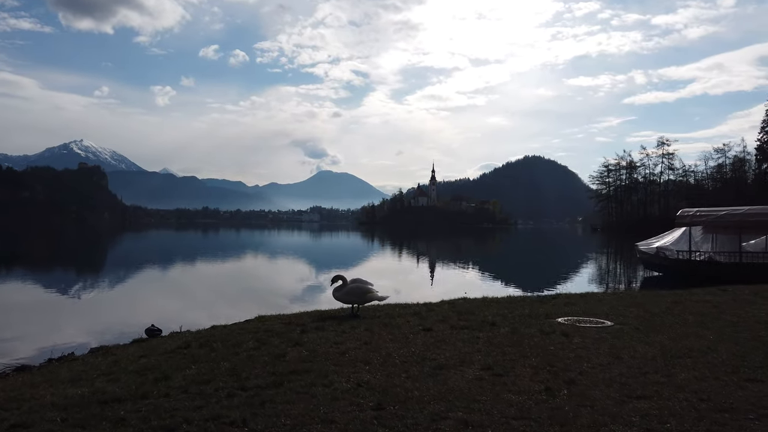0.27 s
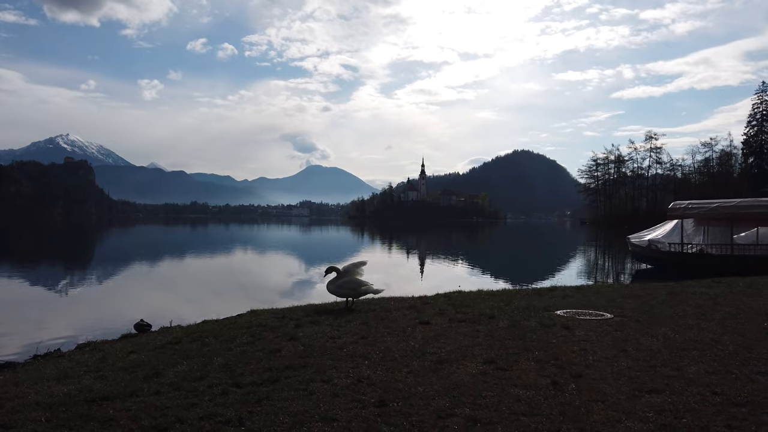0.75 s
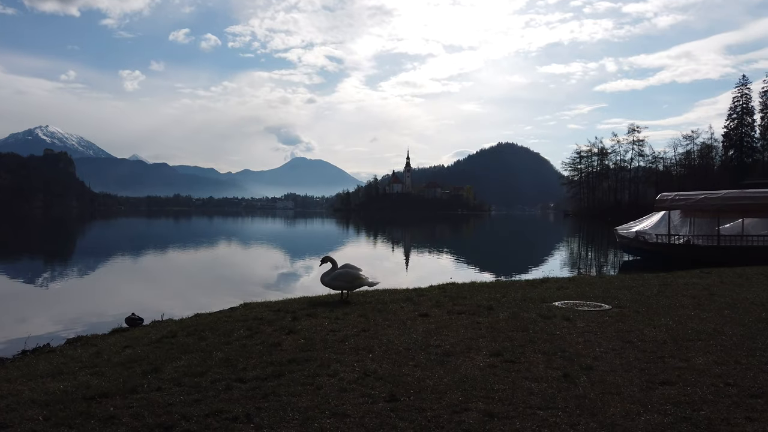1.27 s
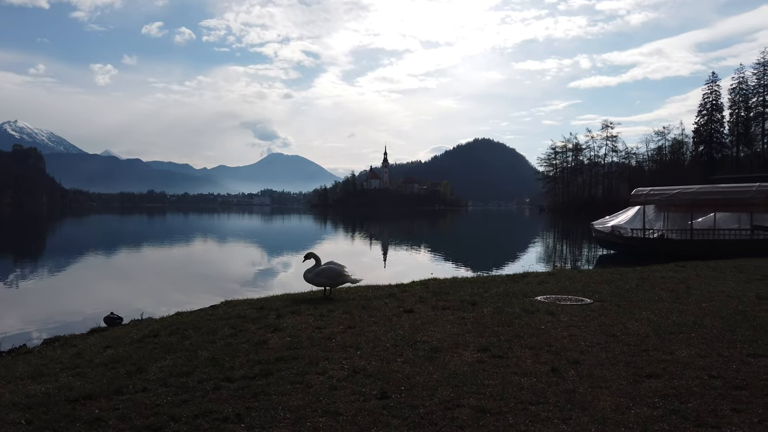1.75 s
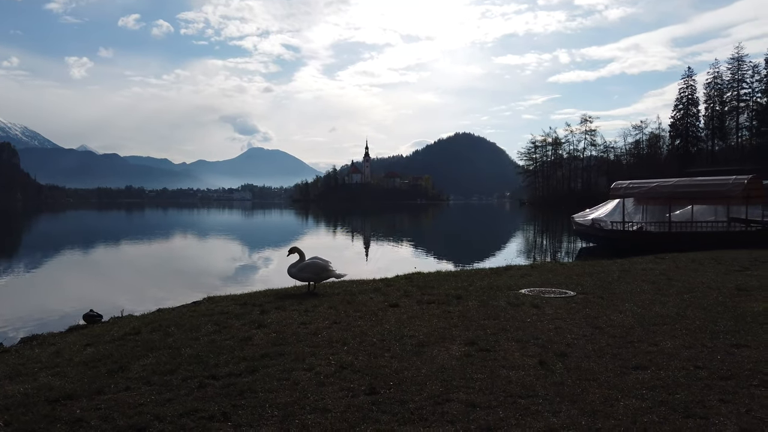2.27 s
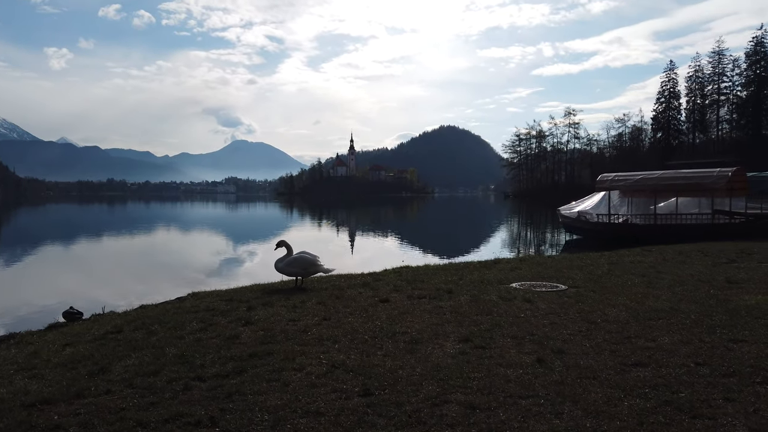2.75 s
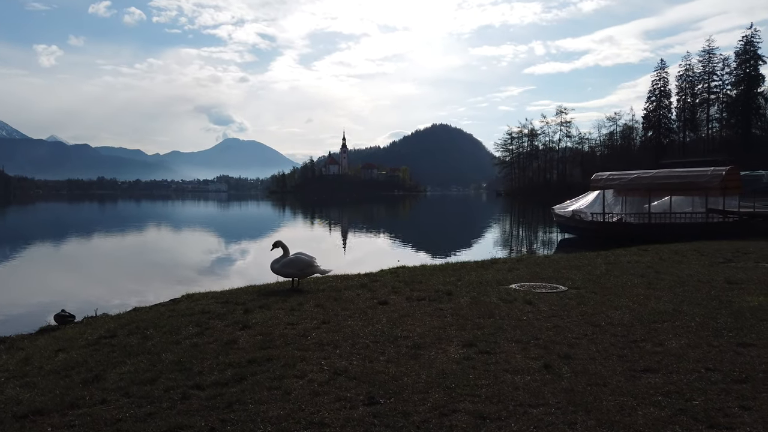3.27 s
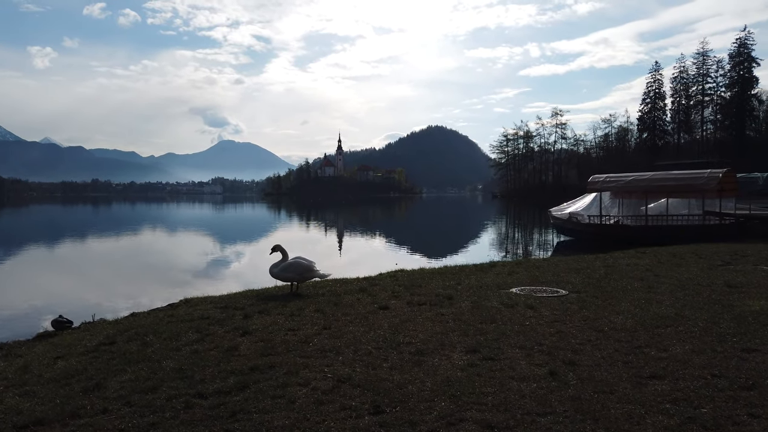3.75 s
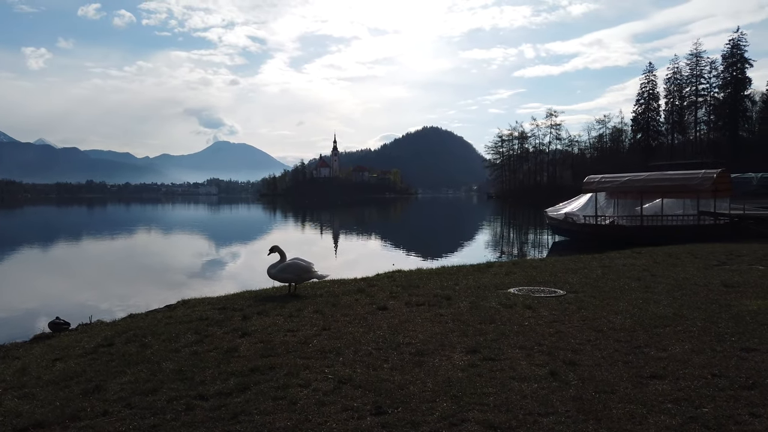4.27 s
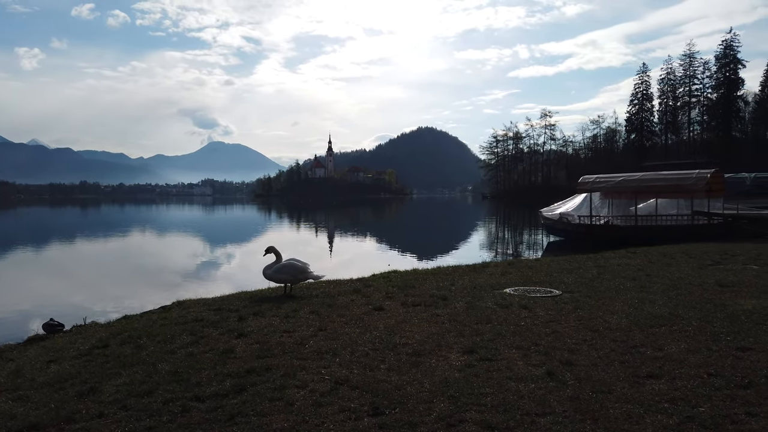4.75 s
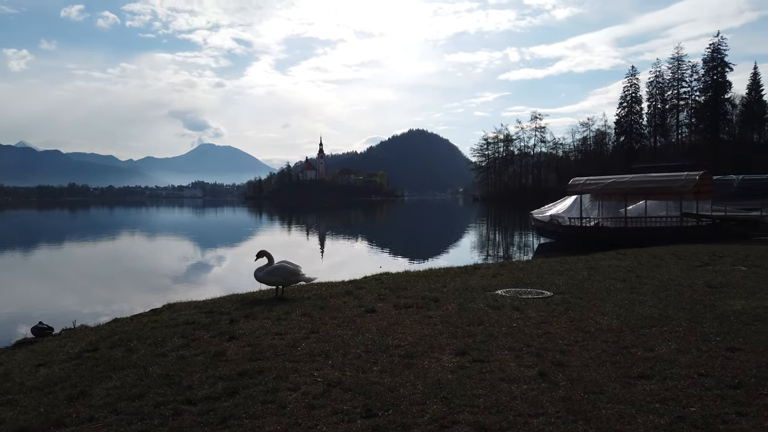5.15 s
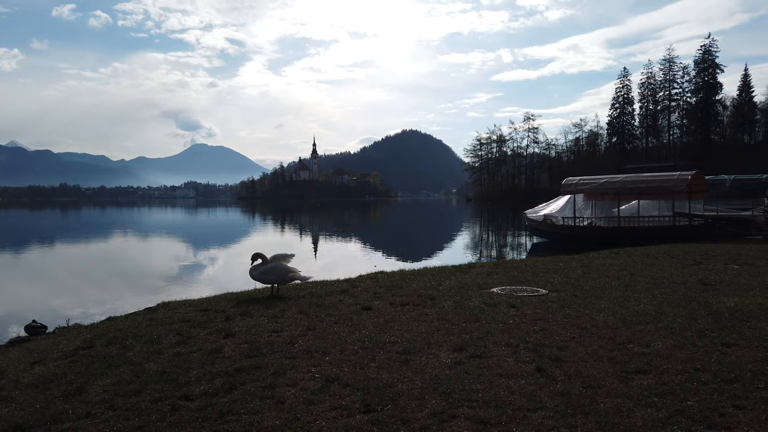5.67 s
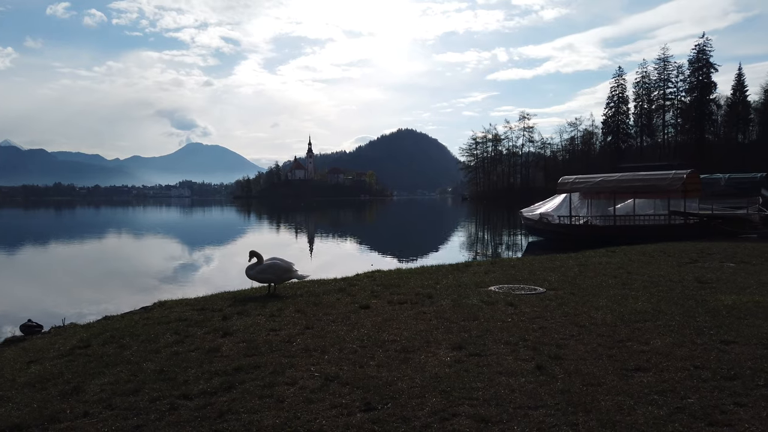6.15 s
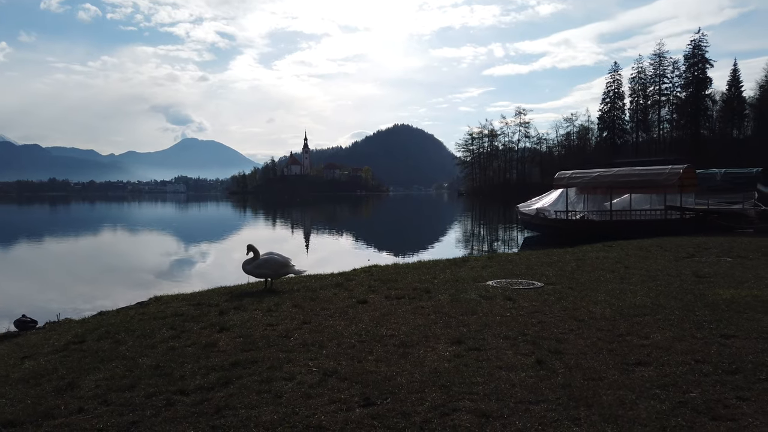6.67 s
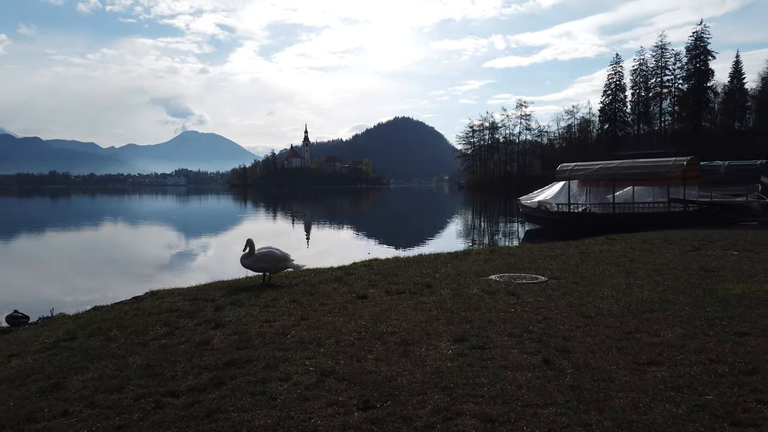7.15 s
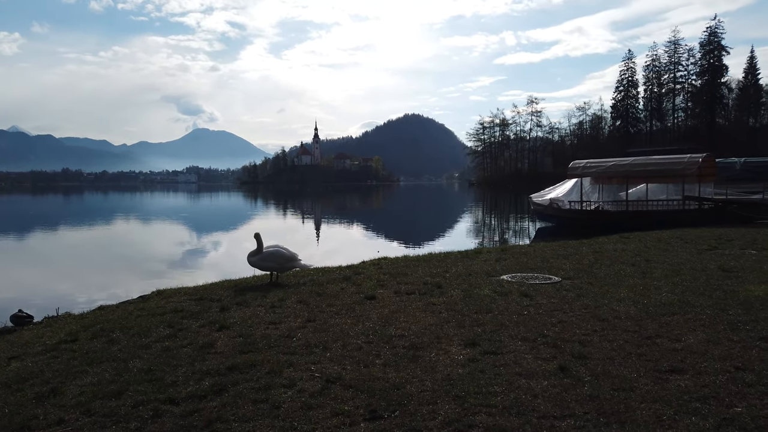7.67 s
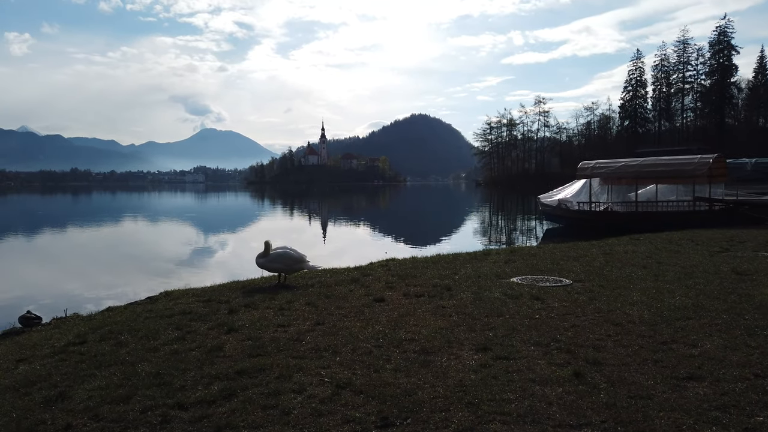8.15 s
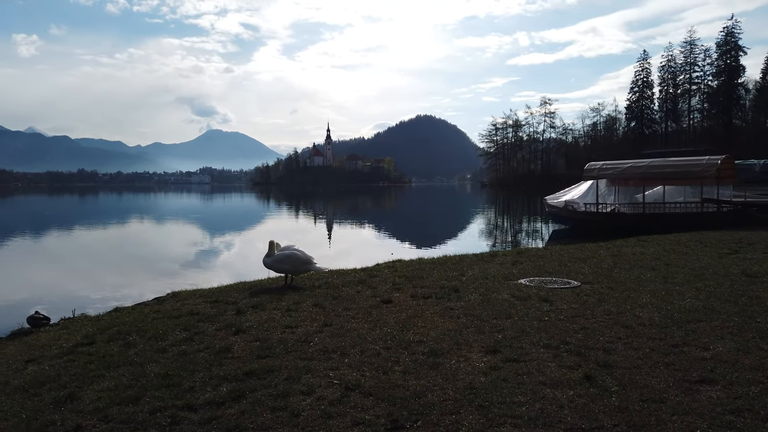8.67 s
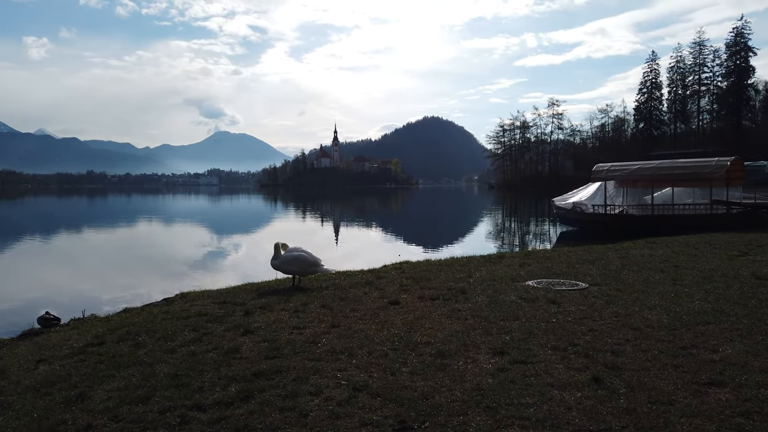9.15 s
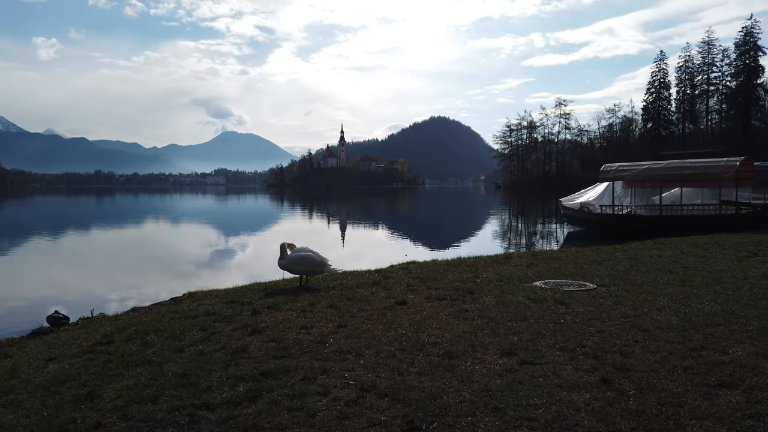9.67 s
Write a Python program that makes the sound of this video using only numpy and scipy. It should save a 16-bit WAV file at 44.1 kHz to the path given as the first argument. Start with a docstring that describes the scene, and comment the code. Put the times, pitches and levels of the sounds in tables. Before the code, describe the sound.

Open lakeside heard through a hand-held stereo camera: low wind rumble and ticks open the scene, then a firm knock at 1.7 seconds. Hoarse little quacks from the middle distance thicken and grow louder, with faint shore echo. Thin, piercing songbird notes come and go, faint pips and whistles sit farther off, and water laps softly at the bank over a distant hush.

```python
"""Ducks and songbirds on a calm lake

Ducks quack in quick runs: each quack is a short train of rough pulses ringing the throat, with a faint shore echo.
A small songbird repeats high arched and slurred notes, and far birds whistle, chirp and pip: gliding tones.
Light wind, as shaped noise, buffets the microphone of a hand-held camera; thumps ring the camera body.
Filtered noise makes the ticks, a scuff, the rustle of a sleeve, laps at the bank and the valley's soft wash."""
import sys
import numpy as np
from scipy import signal
from scipy.fft import rfft, irfft, next_fast_len
from scipy.io import wavfile
from scipy.ndimage import uniform_filter1d, map_coordinates

SR = 44100
rng = np.random.default_rng(int(sys.argv[2]) if len(sys.argv) > 2 else 0)


def master(y):
    """Save y as 16-bit WAV."""
    cut = np.clip(np.atleast_2d(y).T, -1, 1)
    pcm = np.round(cut * 32767)  # scale
    wavfile.write(sys.argv[1], SR, pcm.astype(np.int16))


N = 437031
TIME = np.arange(N) / SR


def undb(db):
    """Decibels to gain."""
    return 10 ** (np.asarray(db) / 20)


def unit(x):
    """Scale to rms 1."""
    return x / np.sqrt(np.mean(x ** 2) + 1e-30)


def decay(t, t60):
    """Exponential decay that falls 60 dB in t60 seconds."""
    return np.exp(-np.log(1000) * t / t60)


def curve(rows):
    """Join (t/s, value) rows by straight lines."""
    return np.interp(TIME, *np.transpose(rows))


def add(track, s, x):
    """Mix a short sound into a track at time s."""
    i = int(np.clip(s * SR, 0, N))
    track[i:i + len(x)] += x[:N - i]


def colour(x, gain):
    """Filter by a gain that is a function of frequency."""
    size = x.shape[-1]
    n = next_fast_len(size + 2048)
    hz = np.arange(n // 2 + 1) * SR / n + 1e-3
    return irfft(rfft(x, n) * gain(hz), n)[..., :size]


def resonance(f, hz, width):
    """Gain of one broad resonance."""
    return 1 / (1 + 2 * ((f - hz) / width) ** 2)


def walk(rate, size=N):
    """Smooth random wandering with a spread near 1."""
    k = max(int(SR / rate), 1)
    steps = np.repeat(rng.standard_normal(size // k + 1), k)
    return uniform_filter1d(steps, k)[:size]


def noise(points, side, apart_hz=4000):
    """Stereo noise with an (f/Hz, level/dB) spectrum; side sets how far the ears differ below apart_hz.

    Well above apart_hz the two ears are unrelated."""
    hz, db = np.transpose(points)
    white = rng.standard_normal((2, N))
    mid, wide = colour(white, lambda f: undb(np.interp(np.log(f), np.log(hz), db)))
    share = lambda f: side + (1 - side) / (1 + (apart_hz / f) ** 6)
    mid = colour(mid, lambda f: 1 / np.hypot(1, share(f)))
    wide = colour(wide, lambda f: share(f) / np.hypot(1, share(f)))
    return unit(np.array([mid + wide, mid - wide]))


def patchy(x, spread_db, rate, width_hz, above_hz):
    """Let each stretch of the spectrum flicker in level on its own, the bass half as much as the treble."""
    f, t, z = signal.stft(x, SR, nperseg=512)
    where = np.meshgrid(f / width_hz, t * rate, indexing="ij")
    chance = rng.standard_normal((128, 1024))
    flicker = map_coordinates(chance, where, order=1, mode="mirror")
    depth = np.clip(f / above_hz - 1, .5, 1)[:, None]
    return signal.istft(z * undb(spread_db * flicker * depth), SR)[1][:, :N]


def swells(rows, attack_s, release_s):
    """Gain of (t/s, length/s, level/dB) events that rise, hold and die away."""
    total = 0
    for s, length, db in rows:
        rise = np.minimum(TIME - s, 0) / attack_s
        fall = np.maximum(TIME - s - length, 0) / release_s
        total = total + undb(db) * np.exp(rise - fall)
    return total


def burst(gain, attack_s, t60):
    """A short dying burst of noise with the given colour."""
    t = TIME[:SR // 2]
    hiss = unit(colour(rng.standard_normal(len(t)), gain))
    return hiss * np.clip(t / attack_s, 0, 1) * decay(t, t60)


def shore(x, t60, wet_db, gap_s):
    """Diffuse echo from the bank and the trees, fading in over gap_s, different in each ear."""
    t = TIME[:SR]
    tail = rng.standard_normal((2, SR)) * decay(t, t60) * np.clip(t / gap_s, 0, 1)
    tail /= np.sqrt(np.sum(tail ** 2, axis=1, keepdims=True))
    return undb(wet_db) * signal.fftconvolve(x[None], tail, axes=1)[:, :N]


def ears(x, lag_s):
    """A sound from one side reaches the right ear lag_s later (earlier if negative)."""
    return np.array([x, colour(x, lambda f: np.exp(-2j * np.pi * f * lag_s))])


def notes_of(runs, sag_hz):
    """(t/s, f/Hz, level/dB, place in run) of evenly spaced notes, stepping steadily in pitch and level."""
    return [(s + k * spacing, hz - k * sag_hz, db - k * fade, k)
            for s, count, spacing, hz, db, fade in runs for k in range(round(count))]


def note(length, hz, shape, waver, flutter_db, scratch=0):
    """A nearly pure tone that follows a shape in pitch and level; a scratch roughens its start."""
    n = int(length * SR)
    share, ratio, db = np.transpose(shape)
    u = np.linspace(0, 1, n)
    glide = uniform_filter1d(np.interp(u, share, ratio), n // 10, mode="nearest")
    unsteady = waver + scratch * np.exp(-10 * u)
    pitch = hz * glide * (1 + unsteady * walk(900, n))
    level_db = np.interp(u, share, db) + flutter_db * walk(125.7, n)
    swell = undb(level_db) * signal.windows.tukey(n, .1)
    return np.sqrt(2) * swell * np.sin(2 * np.pi * np.cumsum(pitch) / SR)


# spectrum of the valley's wash: f/Hz, relative level/dB
AIR = [(62, -0.5), (90, -12.5), (200, -13.5), (400, -20.5), (800, -24), (2400, -20.5), (3500, -32),
       (5000, -39.5), (8000, -48.5), (12000, -42), (15000, -81)]
# slow ebb of the wash's lower part: t/s, level/dB
EBB = [(1, -57), (4, -62), (9.9, -62.5)]


def air(treble_db=-63, ebb_hz=1700):
    """The soft, far wash of the valley: its lower part ebbs and its treble flickers most."""
    wash = patchy(noise(AIR, side=0.25), spread_db=5, rate=16, width_hz=800, above_hz=2400)
    low = colour(wash, lambda f: 1 / (1 + (f / ebb_hz) ** 4))
    treble = wash - low
    return (low * undb(curve(EBB)) + treble * undb(treble_db)) * undb(walk(2.1))


# spectrum of the wind: f/Hz, relative level/dB
WIND = [(32, 0.5), (52, 2), (75, -7), (120, -18), (180, -30), (300, -39.5), (600, -47.5), (1500, -69),
        (6000, -100)]
# the breeze on the microphone: t/s, level/dB before the wind's gain
BREEZE = [(0, -44), (.45, -40.5), (1.45, -60), (1.8, -49.5), (2.05, -52), (2.35, -66), (2.7, -55.5),
          (2.92, -46), (3.15, -60), (4.4, -69), (5.8, -65), (6.1, -50.5), (6.3, -62), (6.55, -53.5),
          (7, -59.5), (7.85, -41.5), (8.25, -60), (8.9, -76), (9.9, -72)]
# single buffets: t/s, length/s, level/dB before the bass filter and the wind's gain
BUFFETS = [(.12, 0.054, -46), (2.14, 0.058, -46), (2.59, 0.05, -45.5), (7.07, 0.093, -45),
           (7.36, 0.028, -47), (7.55, 0.02, -45), (8.55, 0.031, -40)]


def wind(eddy_s=0.067, gain_db=4, lump_db=2, buffet_hz=80):
    """Eddies buffet the two microphone ports: an uneven breeze, and sudden puffs that are deeper."""
    eddies = noise(WIND, side=.85)
    # even out the level, so that the tables alone set it
    eddies /= np.sqrt(uniform_filter1d(np.mean(eddies ** 2, axis=0), int(eddy_s * SR)))
    breeze = eddies * undb(curve(BREEZE) + lump_db * walk(9))
    deep = colour(eddies, lambda f: 1 / np.hypot(1, f / buffet_hz))
    puffs = deep * swells(BUFFETS, attack_s=0.0038, release_s=0.024)
    return undb(gain_db) * (breeze + puffs)


# spectrum of rubbed cloth: f/Hz, relative level/dB
CLOTH = [(500, 8.5), (1200, 12), (3000, 9), (6600, -9.5), (8300, -0.5), (11000, -2.5), (15500, -11.5)]
# rubs of the sleeve: t/s, length/s, level/dB before the sleeve's gain
RUBS = [(.39, 0.091, -74.5), (1.1, 0.19, -78.5), (1.48, 0.22, -77.5), (1.8, 0.16, -76.5), (2.62, 0.36, -81),
        (3.25, 0.25, -79), (6.65, 0.29, -80), (7.64, 0.37, -86), (8.09, 0.24, -81)]


def sleeve(gain_db=8.5, grain_db=3.5, crackle_db=4):
    """Cloth rubs in fine grains, its colour shifting as the folds move."""
    grains = undb(gain_db + grain_db * walk(40) + crackle_db * walk(1100))
    cloth = patchy(noise(CLOTH, side=1.0), spread_db=7, rate=20, width_hz=650, above_hz=1500)
    return cloth * swells(RUBS, attack_s=0.056, release_s=0.093) * grains


# modes of the camera body: f/Hz before the grip detunes it, relative level/dB, t60/s
BODY = [(156.2, -3, 0.11), (292, 1, 0.016), (470, -2, 0.05), (608, -5.5, 0.02), (846, -7.5, 0.021)]


def thump(bright_hz, t60, drag=0.034):
    """A blow and the dying drag of the skin ring the body; the grip detunes its modes.

    A soft blow has a low bright_hz and reaches only the low modes."""
    t = TIME[:SR // 2]
    push = drag * rng.standard_normal(len(t)) * decay(t, t60)
    push[0] += 1  # the blow itself
    push = signal.sosfilt(signal.butter(2, bright_hz, fs=SR, output="sos"), push)
    grip = 1 + .015 * rng.standard_normal(len(BODY))
    body = np.zeros(len(t))
    for (hz, db, ring_s), detune in zip(BODY, grip):
        body += undb(db) * np.sin(2 * np.pi * hz * detune * t) * decay(t, ring_s)
    sound = signal.fftconvolve(push, body)[:len(t)]
    # the rms of a plain decay, so that long and short thumps start about equally loud
    return unit(sound) * np.sqrt(np.mean(decay(t, t60) ** 2))


# thumps of the hand on the camera, and at 7.779 s a low rumble of the wind played alike: t/s, level/dB,
# brightness f/Hz, t60/s
THUMPS = [(1.663, -34.5, 900, 0.25), (2.005, -46, 198, 0.15), (2.149, -49, 257, 0.67),
          (2.728, -39.5, 220, 0.29), (6.652, -50.5, 705, 0.12), (7.779, -47.5, 110, 0.64)]
# sharp ticks: t/s, level/dB before tick_db, f/Hz, width/Hz before squaring
TICKS = [(0.133, -44, 1690, 600), (0.563, -45.5, 1700, 556), (0.608, -49, 2320, 1700),
         (.652, -44, 1880, 700), (0.677, -48, 1720, 702), (2.504, -42.5, 3660, 1290)]
# a finger's scuff: t/s, length/s, level/dB, f/Hz, width/Hz before squaring
SCUFF = (1.661, .022, -52, 2400, 2900)


def handling(tick_db=3):
    """Thumps on the camera body, a low rumble of the wind, a finger's scuff around the hardest one, and brief
    ticks."""
    out = np.zeros(N)
    for s, db, bright_hz, t60 in THUMPS:
        add(out, s, undb(db) * thump(bright_hz, t60))
    for s, db, hz, width in TICKS:
        tick = burst(lambda f: resonance(f, hz, width) ** 2, attack_s=0.00091, t60=0.018)
        add(out, s, undb(db + tick_db) * tick)
    s, length, db, hz, width = SCUFF
    scuff = unit(colour(rng.standard_normal(N), lambda f: resonance(f, hz, width) ** 2))
    return out + scuff * swells([(s, length, db)], attack_s=.004, release_s=.004)


# laps at the bank, and at 5.318 s a distant call made alike: t/s, level/dB, f/Hz, width/Hz, t60/s
LAPS = [(0.369, -56.5, 714, 348, 0.26), (2.95, -58.5, 930, 686, 0.6), (4.324, -61.5, 620, 120, 0.081),
        (4.535, -56, 554, 120, 0.1), (5.318, -55.5, 1020, 353, 0.43)]


def water():
    """Small hollow laps at the bank and one distant call: dying bursts of noise through one resonance."""
    out = np.zeros(N)
    for s, db, hz, width, t60 in LAPS:
        add(out, s, undb(db) * burst(lambda f: resonance(f, hz, width), attack_s=0.001, t60=t60))
    return out


# gliding whistles: t/s, length/s, start f/Hz, end f/Hz, level/dB
WHISTLES = [(0, 0.073, 2890, 2370, -58), (.266, 0.082, 2720, 2330, -61.5), (.335, 0.079, 2350, 2750, -60.5),
            (.385, 0.076, 2784, 2380, -60.5), (3.355, 0.07, 2860, 2290, -61.5),
            (3.6, 0.15, 2400, 2830, -65.5), (3.78, 0.1, 2960, 2744, -66.5), (7.104, 0.13, 2410, 2090, -64),
            (7.247, 0.15, 2686, 2696, -62)]
# a run of chirps: t/s, notes, spacing/s, top f/Hz, level/dB, fade per note/dB
CHIRP_RUN = (.955, 4, .111, 3300, -67.5, 0)
# shape of a chirp: share of length, pitch ratio, relative level/dB
PEAKED = [(0, .75, -8), (.4, 1, -2), (1, .6, 0)]
# thin, nearly level pips: t/s (each starts .02 s sooner), start f/Hz, level/dB before the echo
PIPS = [(2.385, 4064, -68.5), (2.886, 4120, -67.5), (3.387, 4060, -71), (4.601, 4090, -69.5),
        (5.029, 3970, -76.5), (6.78, 4080, -69), (7.339, 3270, -65), (8.318, 4100, -73),
        (9.23, 3450, -67.5)]


def far_bird(lag_s=-0.000055, pip_db=-3):
    """Whistles and chirps from the right, blurred by the wood they cross; pips arrive only as echo."""
    dry, farther = np.zeros((2, N))
    for s, length, start_hz, end_hz, db in WHISTLES:
        ratio = end_hz / start_hz
        glide = [(0, 1, -4), (.5, ratio ** .5, 0), (1, ratio, -6)]
        add(dry, s, undb(db) * note(length, start_hz, glide, waver=0.008, flutter_db=7.0))
    for s, hz, db, _ in notes_of([CHIRP_RUN], sag_hz=0):
        add(dry, s, undb(db) * note(.053, hz, PEAKED, waver=.005, flutter_db=2))
    for s, hz, db in PIPS:
        pip = note(.1, hz, [(0, 1, -2), (1, .97, 0)], waver=.012, flutter_db=2)
        add(farther, s - .02, undb(db) * pip)
    blur = shore(dry, t60=0.4, wet_db=-2, gap_s=0.002)
    return ears(dry, lag_s) + blur + shore(farther, t60=.5, wet_db=pip_db, gap_s=.02)


# shapes of the arched and slurred notes: share of length, pitch ratio, relative level/dB
ARCH = [(0, 1, -17), (.16, .99, -6), (.3, 1, 0), (.55, .975, -1), (.8, .948, -4), (1, .935, -10)]
SLUR = [(0, 1.15, -14), (.1, 1.095, -7), (.24, 1.025, -3), (.38, 1, 0), (.9, 1, 0), (1, .99, -6)]
# runs of arches: t/s, notes, spacing/s, first top f/Hz, first level/dB, fade per note/dB
ARCH_RUNS = [(.688, 2, 0.16, 7125, -46, 2.5), (1.421, 2, 0.16, 6960, -49, 1),
             (2.2, 1, .165, 6780, -49.5, 19), (5.598, 2, 0.16, 7080, -50, 1),
             (6.486, 2, 0.17, 6850, -48, 1.5), (7.263, 1, .165, 6880, -47.5, 0),
             (9.671, 2, 0.16, 7100, -50.5, -0.5)]
# runs of slurs: t/s, notes, spacing/s, first final f/Hz before scatter, first level/dB,
# fade per note/dB, added droop per note as a share of pitch
SLUR_RUNS = [(0.987, 3, 0.13, 5090, -49, 0.5, 0.0097), (1.735, 3, 0.14, 5013, -49, -1, 0.0017),
             (5.9, 4, 0.1358, 5115, -51.5, -0.16, 0.018), (6.804, 3, 0.15, 5015, -53, 0.5, 0.0076)]
# quick upsweep of the second voice: length/s, start f/Hz, end f/Hz, level relative to the arch/dB
UPSWEEP = (.009, 4800, 6500, -19)


def songbird(lag_s=.00004):
    """Arches, opened by a second voice's upsweeps, and slurs that droop more along a run; a little left."""
    dry = np.zeros(N)
    length, start_hz, end_hz, below_db = UPSWEEP
    rise = [(0, 1, -4), (1, end_hz / start_hz, 0)]
    for s, hz, db, _ in notes_of(ARCH_RUNS, sag_hz=141.0):
        arch = note(.102, hz, ARCH, waver=.008, flutter_db=2.8, scratch=.09)
        add(dry, s, undb(db) * arch)
        sweep = note(length, start_hz, rise, waver=.05, flutter_db=2)
        for k in range(3):
            offset_s = (k - 1) * length / 2 * (1 + rng.random() / 2)
            add(dry, s + offset_s, undb(db + below_db) * sweep)
    for *run, droop in SLUR_RUNS:
        for s, hz, db, k in notes_of([run], sag_hz=17):
            shape = [(u, ratio - k * droop * (u - .5), level) for u, ratio, level in SLUR]
            scatter = 1 + .005 * rng.standard_normal()
            slur = note(.091, hz * scatter, shape, waver=.004, flutter_db=3)
            add(dry, s, undb(db) * slur)
    return ears(dry, lag_s) + shore(dry, t60=0.44, wet_db=-15.0, gap_s=0.0067)


# decay of each puff of turbulence; a quack crests a fixed time plus a share of its length after it starts
PUFF_S, CREST_S, CREST_SHARE = .005, .019, .36
# no two quacks are alike: random shares of each resonance's frequency, within and between quacks
RESONANCE_WAVER, RESONANCE_SCATTER = .012, .014
# duck throat: f/Hz before it is moved, width/Hz of one of four filter stages, relative level/dB
THROAT = [(1241, 252, -13.5), (1708, 239, 0), (2040, 202, 2.5), (2593, 188, -2), (3150, 180, -21)]


def quack(length, rate_hz, upper_hz, upper_db, rasp, glide, sag=.07):
    """Two membranes snap in turn each cycle, with a puff of turbulence, and ring the throat.

    Rate and resonances follow effort and waver from snap to snap."""
    n = int(length * SR)
    t = TIME[:n]
    crest = np.clip(CREST_S / length + CREST_SHARE, .1, .9)
    effort = np.sin(np.pi * np.interp(t / length, [0, crest, 1], [0, .5, 1]))
    lift = effort - np.average(effort, weights=effort)
    hz = rate_hz * (1 + sag * lift) * (1 + .018 * walk(rate_hz, n))
    phase = np.cumsum(hz) / SR + .5
    # one click at each whole cycle
    snaps = lambda p: np.diff(np.floor(p), prepend=np.floor(p[0]))
    twin_lag = rng.uniform(.15, .5) + .03 * walk(30, n)  # in cycles
    pulses = snaps(phase) + undb(-11) * snaps(phase - twin_lag)
    since_snap = (phase % 1) / hz
    puffs = rasp * rng.standard_normal(n) * np.exp(-since_snap / PUFF_S)
    size = undb(1.8 * walk(rate_hz, n))
    source = (pulses + puffs) * size * undb(-11 * (1 - effort) ** 1.8)
    own = 1 + RESONANCE_SCATTER * rng.standard_normal(len(THROAT))
    voice = np.zeros(n)
    for k, (centre, width, db) in enumerate(THROAT):
        # the higher a resonance, the more it moves and swells with the bill
        place = centre * own[k] * (upper_hz / THROAT[3][0]) ** min((k + 1) / 4, 1)
        bill_db = upper_db * np.clip((k - 1) / 2, 0, 1)
        ring = colour(source, lambda f: (1 + 1j * (f - place) / width) ** -4.)
        # shift the ringing in frequency as the throat moves
        drift = place * (glide * lift + RESONANCE_WAVER * walk(rate_hz, n))
        ring = np.real(signal.hilbert(ring) * np.exp(2j * np.pi * np.cumsum(drift) / SR))
        voice += (-1) ** k * undb(db + bill_db) * ring
    return unit(voice * signal.windows.tukey(n, .08))


# turbulence beside the pulses in a quack of QUACK_DB
RASP, QUACK_DB = .048, -58.5
# share by which effort lifts the resonances, and its scatter between quacks
GLIDE, GLIDE_SCATTER = .08, .05
# quacks: t/s, length/s, central pulse rate f/Hz, level/dB, upper resonances' level as the bill opens/dB,
# upper resonance f/Hz before scatter
QUACKS = [(0.197, 0.064, 86.0, -59, -18, 2620), (0.465, 0.075, 92.8, -57, -11, 2590.0),
          (0.756, 0.056, 85.7, -55, -14, 2850), (1.08, 0.076, 84.5, -63, -14, 2300),
          (1.216, 0.074, 84.0, -57.5, -9, 2680), (1.451, 0.082, 91.3, -52.5, -5, 2790),
          (1.612, 0.1, 82.2, -55, -5, 2550), (1.756, 0.094, 86.2, -55.5, 0, 2750),
          (1.899, 0.063, 87.0, -53, -7, 2660), (1.999, 0.087, 91.3, -57, -5, 2820),
          (2.208, 0.07, 95.0, -55, -1, 2650), (2.331, 0.072, 84.5, -56.5, -10.5, 2830),
          (2.425, 0.069, 99.5, -53.0, -0.5, 2580), (2.562, 0.077, 92.4, -53.5, -6, 2730),
          (2.808, 0.065, 91.1, -56.5, -8, 2580), (2.922, 0.085, 88.3, -57, -4, 2540),
          (3.154, 0.071, 98.2, -53.5, -1, 2710), (3.391, 0.095, 84.0, -57, 8, 2380),
          (3.476, 0.098, 105.6, -53.5, -5, 2750), (3.697, 0.096, 94.6, -50, -5.5, 2750.0),
          (3.902, 0.061, 99.6, -54, -6.5, 2650), (4.085, 0.084, 90.0, -58, -13, 2590),
          (4.172, 0.081, 109.5, -56.5, 11, 2330), (4.344, 0.12, 97.5, -53.5, -2.5, 2600),
          (4.525, 0.12, 114.3, -57.5, 4, 2580), (4.616, 0.17, 91.7, -53.5, 1, 2615),
          (4.93, 0.17, 100.3, -54.5, -1, 2700), (5.205, 0.063, 96.0, -52, 1, 2580),
          (5.269, 0.066, 97.1, -57.5, 1, 2730.0), (5.366, 0.12, 111.4, -56, 7, 2465),
          (5.469, 0.11, 97.0, -55, -1, 2680), (5.573, 0.061, 113.6, -53.5, -2, 2560),
          (5.741, 0.12, 106.1, -51.5, -0.5, 2580), (5.846, 0.08, 86.0, -53.5, -13, 3070),
          (6.062, 0.079, 92.6, -48, 0, 2594), (6.266, 0.14, 94.7, -52, 0, 2550),
          (6.589, 0.077, 102, -53.5, -2.5, 2590), (6.69, 0.092, 83, -54.5, 3, 2610),
          (6.921, 0.15, 94.5, -52, -2, 2680), (7.185, 0.074, 95.8, -50.5, -0.5, 2490),
          (7.549, 0.17, 89, -56, -3, 2540), (7.797, 0.1, 110.1, -52, -2.5, 2550),
          (8.099, 0.073, 97.4, -56.5, -6, 2510), (8.19, 0.096, 87.7, -56.0, -7, 2560),
          (8.288, 0.11, 101.0, -53.5, -2.5, 2460), (8.408, 0.12, 99.2, -55.5, -2.5, 2570),
          (8.594, 0.08, 101.6, -53.0, -0.5, 2510), (8.778, 0.12, 106.9, -53.0, 1, 2500),
          (8.968, 0.095, 93.8, -56.5, -1, 2720), (9.109, 0.08, 94.3, -54.5, -3, 2520),
          (9.295, 0.11, 103.6, -53.5, 1, 2560), (9.547, 0.16, 92.9, -54, -3.5, 2590),
          (9.797, 0.14, 102.6, -52, 0, 2550)]


def ducks(width=0.11):
    """All the quacks, straight ahead over the water, with shore echoes; harder ones are hoarser."""
    dry = np.zeros(N)
    chances = rng.standard_normal(len(QUACKS))
    for (s, length, rate_hz, db, bill_db, upper_hz), chance in zip(QUACKS, chances):
        rasp = RASP * undb((db - QUACK_DB) / 2)
        glide = GLIDE + GLIDE_SCATTER * chance
        add(dry, s, undb(db) * quack(length, rate_hz, upper_hz, bill_db, rasp, glide))
    # central echo, and a second one opposed in the two ears to widen it
    echo, spread = shore(dry, t60=0.098, wet_db=-8.0, gap_s=0.06)
    near = shore(dry, t60=0.14, wet_db=-16.0, gap_s=0.0089)
    return dry + near + echo + width * np.array([spread, -spread])


def scene():
    """Moving air, small knocks, water and birds."""
    return air() + wind() + sleeve() + handling() + water() + far_bird() + songbird() + ducks()


def record(dry, top_hz=15700):
    """The camera cuts the top with a steep low-pass."""
    return signal.sosfilt(signal.ellip(8, .2, 70, top_hz, fs=SR, output="sos"), dry)


dry = scene()
out = record(dry)
master(out)
```